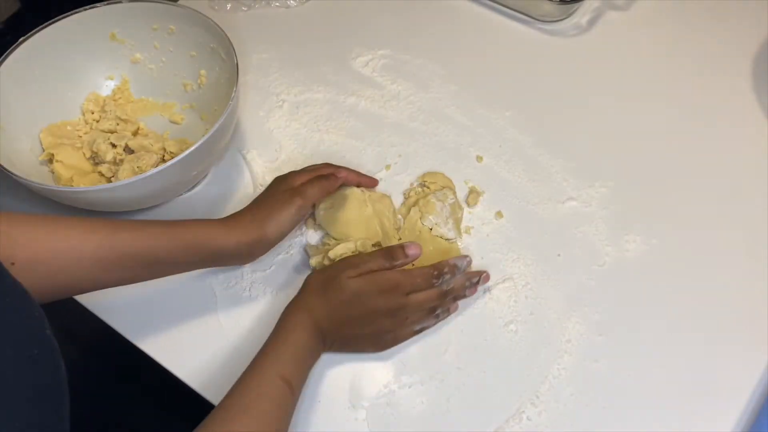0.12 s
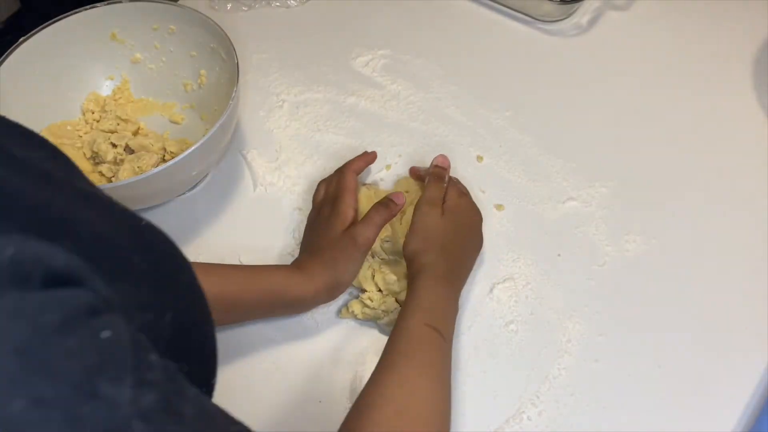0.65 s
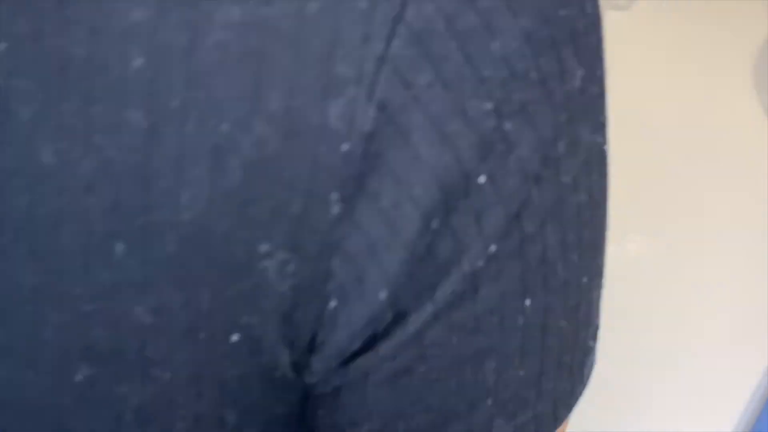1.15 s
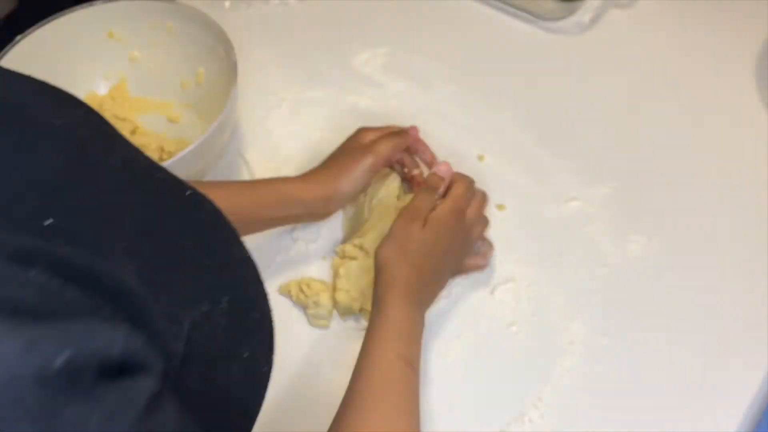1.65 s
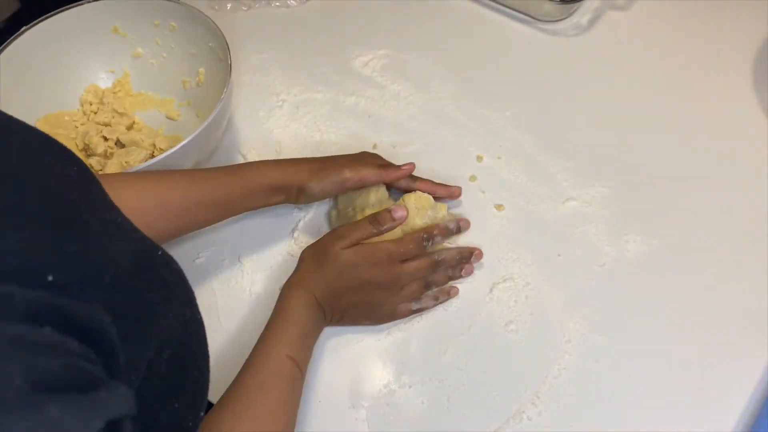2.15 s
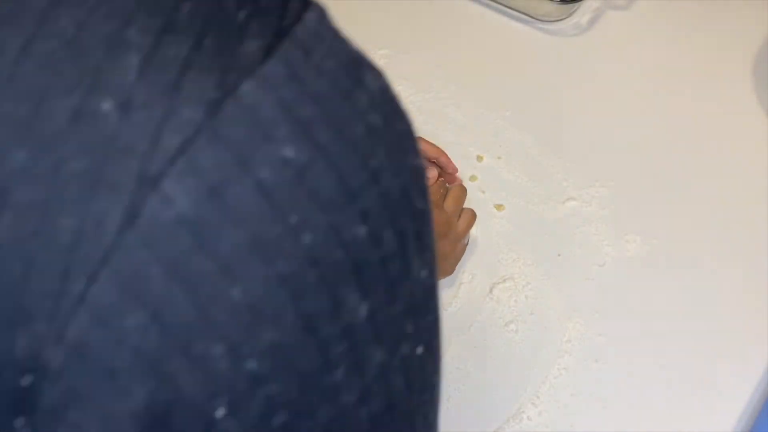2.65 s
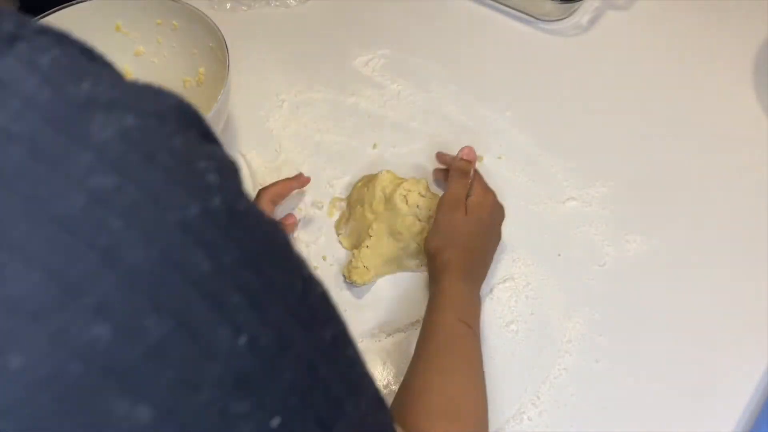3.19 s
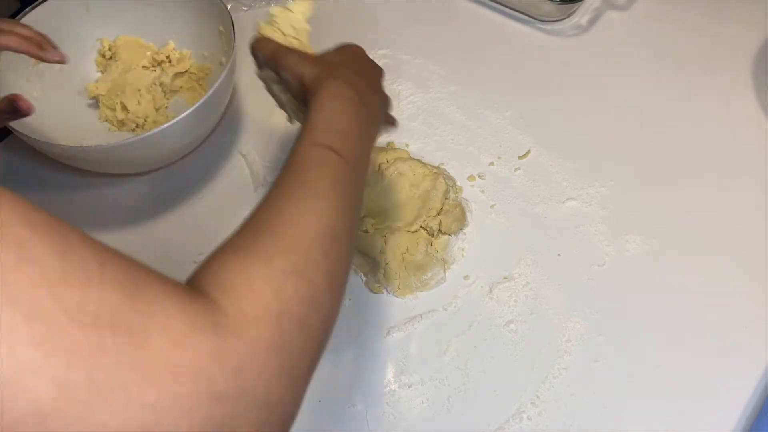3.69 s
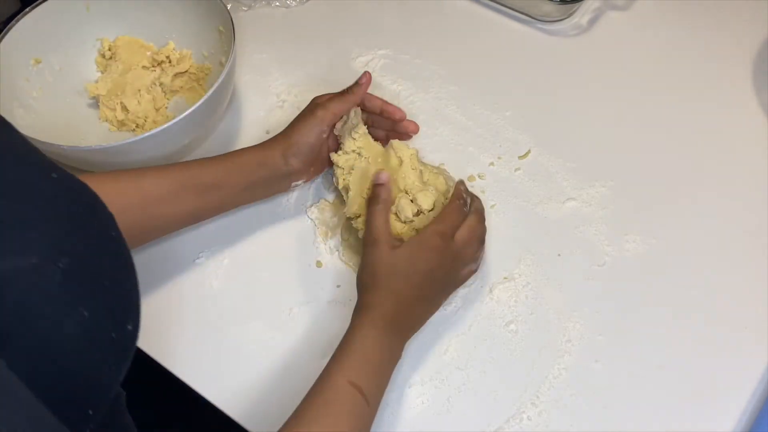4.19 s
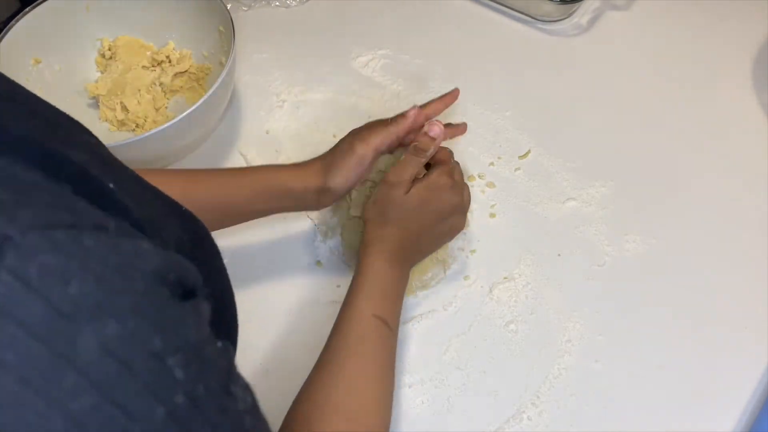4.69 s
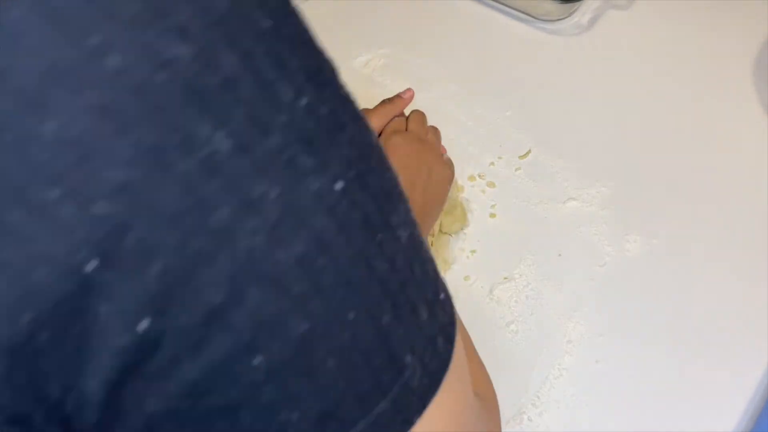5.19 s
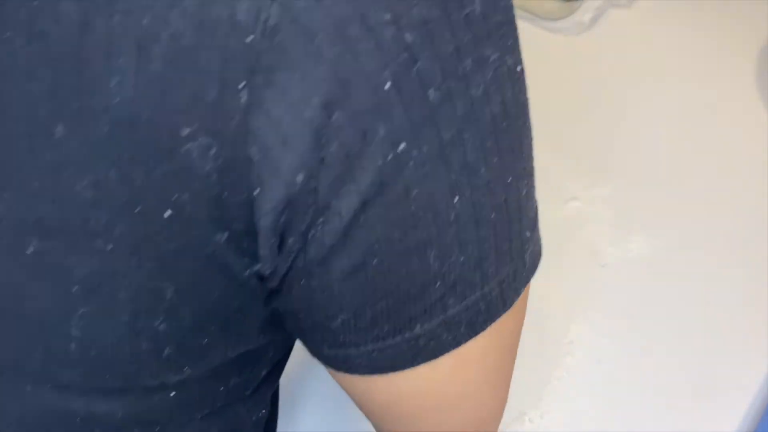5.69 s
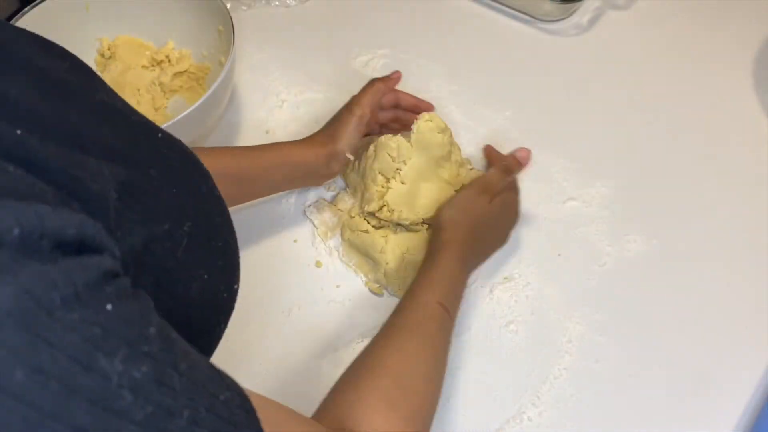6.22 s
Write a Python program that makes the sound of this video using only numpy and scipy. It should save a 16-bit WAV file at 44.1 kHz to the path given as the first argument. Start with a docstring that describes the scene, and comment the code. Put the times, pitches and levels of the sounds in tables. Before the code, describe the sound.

Over a fridge-like hum, hands sweep and knead dough with gritty rubs, sticky ticks, a few thuds, faint clinks and one brief bowl scrape.

```python
"""Hands gather and press dough on a floured counter: palms hiss and drag as shaped noise under stroke gains.
Knocks, dough thuds, crockery clinks and sticky ticks are short contacts that ring decaying modes.
A sliding bowl filters grit through its resonances; early echoes and a noise tail answer the contacts.
A fridge motor, a fan and mains hum (sines) throb over the room's air (noise). Everything dips briefly once.
Source levels are dB before the dip and the record gain."""
import sys
import numpy as np
from scipy import signal
from scipy.fft import rfft, irfft
from scipy.io import wavfile
from scipy.ndimage import uniform_filter1d

SR = 44100
rng = np.random.default_rng(int(sys.argv[2]) if len(sys.argv) > 2 else 0)


def unload_audio(sound):
    """Save the sound as a 16-bit wav file, at the path given as the first command line argument."""
    columns = np.transpose(np.atleast_2d(sound))
    # keep every value between -1 and 1, then stretch to whole-number steps
    steps = np.round(np.clip(columns, -1, 1) * 32767)
    wavfile.write(sys.argv[1], SR, steps.astype(np.int16))


def volts(x):
    """Linear amplitude factor 10**(x/20) for a level x in dB, scalar or array-like."""
    e = np.asarray(x, float) / 20
    return 10 ** e


N = 279567
T = np.arange(N) / SR
PORT_LAG_S = 0.00046  # right microphone hears the room this much later
DIP_S = 3.335


def level(x, db):
    """Scale to an rms level."""
    return x * volts(db) / np.sqrt(np.mean(x ** 2))


def colour(x, points):
    """Filter by (freq_hz, gain_db) points, interpolated over log frequency."""
    hz, db = np.transpose(points)
    f = np.maximum(np.fft.rfftfreq(x.shape[-1], 1 / SR), 1)
    gain = volts(np.interp(np.log(f), np.log(hz), db))
    return irfft(rfft(x) * gain, x.shape[-1])


def walk(rate_hz):
    """Random levels held 1 / rate_hz and slewed twice; spread near 1."""
    k = int(SR / rate_hz)
    held = np.repeat(rng.standard_normal(N // k + 1), k)
    return 1.45 * uniform_filter1d(uniform_filter1d(held, k), k)[:N]


def pan(left_minus_right_db):
    """Left and right gain."""
    return volts(np.array([[left_minus_right_db], [-left_minus_right_db]]) / 2)


def pair(make, alike, lag_s):
    """Two channels: a shared part, lag_s later on the right, and a part of their own."""
    shared, share = make(), np.clip(alike, 0, 1)
    both = np.array([shared, np.roll(shared, round(lag_s * SR))])
    own = np.array([make(), make()])
    return np.sqrt(share) * both + np.sqrt(1 - share) * own


def white():
    """Plain white noise."""
    return rng.standard_normal(N)


def grit():
    """Dense grains of uneven size."""
    size_db = 2.4 * rng.exponential(1, N)
    return rng.standard_normal(N) * volts(size_db)


def strokes(rows, lift_db_per_s):
    """Gain of strokes that rise smoothly, sag while they hold and die away; their powers add."""
    sag_db_per_s = 12
    start, rise, hold, db = np.transpose(rows)[:, :, None]
    coarse = T[::64]
    t = coarse - start
    held = np.clip(t - rise, 0, hold)
    lifted = np.maximum(t - rise - hold, 0)
    onset = np.sin(np.pi / 2 * np.clip(t / rise, 0, 1)) ** 2
    gain = onset * volts(db - sag_db_per_s * held - lift_db_per_s * lifted)
    return np.interp(T, coarse, np.sqrt(np.sum(gain ** 2, axis=0)))


def ring(modes, sides):
    """Exponentially decaying sine modes, each with its weight on the two sides."""
    hz, db, t60 = np.transpose(modes)[:, :, None]
    t = T[:SR // 2]
    decay = np.exp(-np.log(1000) * t / t60)
    return sides @ (volts(db) * np.sin(2 * np.pi * hz * t) * decay)


def centred(modes):
    """Equal mode weights on both sides."""
    return np.ones((2, len(modes)))


def blow(contact_ms):
    """A force that rises and relaxes smoothly; softer contact lasts longer."""
    u = T[:SR // 20] * 4000 / contact_ms
    force = u * np.exp(-u)
    return force / np.sum(force)


def rattle(length_ms):
    """A firm first contact and a dying run of tiny uneven ones."""
    t = T[:SR // 10]
    fade = np.exp(-t * 3000 / length_ms)
    run = grit()[:SR // 10] * fade / np.sqrt(np.sum(fade ** 2))
    return run + 0.27 * (t == 0)


def add(out, s, db, push, body):
    """One contact: the push sets the body ringing."""
    sound = signal.fftconvolve(body, push[None], axes=1)
    i = round(s * SR)
    out[:, i:i + sound.shape[1]] += volts(db) * sound[:, :N - i]


# air spectrum: freq_hz, density_db_per_hz (relative)
AIR_SHAPE = [(25, -14), (50, -4.5), (80, -3.5), (120, -0.5), (180, -3.5), (320, -4), (500, -10.5),
             (700, -20.5), (1200, -25.5), (1700, -31.5), (2200, -43), (5000, -42.5), (12000, -55),
             (16000, -59.5)]


def air():
    """Broad rumble of fans in the room: noise alike left and right in the bass, less so above."""
    bass = colour(pair(white, alike=0.58, lag_s=PORT_LAG_S), [(150, -0.5), (600, -13), (2000, -42.5)])
    rest = colour(pair(white, alike=0.3, lag_s=PORT_LAG_S), [(50, -26), (150, -5), (600, 0.5)])
    noise = level(colour(bass + rest, AIR_SHAPE), -61.5)
    return noise * pan(-1.2) * volts(0.6 * walk(3.6))


# fridge motor harmonics: order, level_db_rms (before wander and pan)
MOTOR_ORDERS = [(1, -74), (2, -63.5), (3, -83.5), (4, -81.5), (5, -74.5), (6, -76), (7, -81.5)]
# fan harmonics: order, level_db_rms (before wander and pan); order 27 is the blade tone
FAN_ORDERS = [(1, -66), (4, -82.5), (8, -77), (27, -81)]


def hum():
    """Motor and fan run three turns a second apart and throb, with mains hum; louder on the right."""
    motor_hz, fan_hz, mains_hz, mains_db = 56.17, 59.43, 119.94, -70.5
    # motor and fan fundamentals align at these times; the phases jump at the dip
    align_before_s, align_after_s = 0.075, 4.19
    clock = T - np.where(T < DIP_S, align_before_s, align_after_s)
    turn = 2 * np.pi * (clock - np.array([[0], [PORT_LAG_S]]))
    motor = sum(volts(db + 1.3 * walk(2.8)) * np.cos(k * motor_hz * turn + k - 1)
                for k, db in MOTOR_ORDERS)
    fan = sum(volts(db + (0.8 + 0.05 * k) * walk(4.5 + 0.5 * k)) * np.cos(k * fan_hz * turn + k - 1)
              for k, db in FAN_ORDERS)
    mains = volts(mains_db) * np.cos(mains_hz * turn)
    return np.sqrt(2) * pan(-2.0) * (motor + fan + mains)  # sqrt(2): rms to peak


def room(x):
    """A fading cloud of reflections, duller than the direct sound; its bass is the same on both sides."""
    t60_s, room_db, onset_s = 0.46, -3, 0.0013
    t = T[:SR // 2]
    own, shared = rng.standard_normal((2, len(t))), rng.standard_normal(len(t))
    own = colour(own, [(30, -30), (100, -8), (500, 2.5), (1200, -1), (4000, -5), (12000, -5)])
    shared = colour(shared, [(30, -25), (90, -4), (200, -1), (800, -12.5), (3000, -36.5)])
    tail = (own + shared) * np.exp(-np.log(1000) * t / t60_s) * np.minimum(t / onset_s, 1)
    tail /= np.sqrt(np.sum(tail ** 2) / 2)
    return volts(room_db) * signal.fftconvolve(x.mean(0)[None], tail, axes=1)[:, :N]


# nearby walls: delay_ms, level_db, left_minus_right_db
WALLS = [(5.6, -9.5, 6.5), (8.2, -10, -5), (14.2, -9.5, 5)]


def echoes(x):
    """Single early reflections: delayed, weakened, panned copies."""
    return sum(volts(db) * pan(pan_db) * np.roll(x, round(ms * SR / 1000), axis=1)
               for ms, db, pan_db in WALLS)


# bowl slide: start_s, rise_s, hold_s, level_db
SLIDE_LOW = (3.335, .018, .14, -55.5)
# its high resonances start later and stop sooner: start_s, rise_s, hold_s, level_db
SLIDE_TOP = (3.35, .04, .09, -66)
# bowl resonances: freq_hz, width_hz, level_db (relative within the low or high group)
BOWL_PEAKS = [(600, 30, 0), (736, 70, 3.5), (1070, 890, -3), (2400, 1200, -15), (1790, 40, -3),
              (2055, 39, 3), (2220, 60, -3), (2510, 20, 5.5), (3220, 99, -13), (5000, 90, 0),
              (6360, 180, -11), (6000, 5000, -32)]


def bowl():
    """The foot of the bowl scrapes in slips and rings its resonances, low and high groups apart."""
    split_hz, low_stop_db_per_s, high_stop_db_per_s = 4000, 160, 190
    scrape = rfft(pair(grit, alike=0.5, lag_s=0.00029) * volts(1.1 * walk(55)))
    f = np.fft.rfftfreq(N, 1 / SR)

    def resonate(peaks):
        power = sum(volts(db) ** 2 / (1 + (2 * (f - hz) / width) ** 2) for hz, width, db in peaks)
        return level(irfft(scrape * np.sqrt(power), N), 0)

    low = resonate([p for p in BOWL_PEAKS if p[0] < split_hz])
    high = resonate([p for p in BOWL_PEAKS if p[0] > split_hz])
    return low * strokes([SLIDE_LOW], low_stop_db_per_s) + high * strokes([SLIDE_TOP], high_stop_db_per_s)


# crockery clinks: start_s, strength_db, rattle_ms
CLINK_EVENTS = [(3.038, -79, 30), (3.543, -65, 20), (3.62, -64.5, 40), (3.691, -76.5, 39),
                (3.955, -65.5, 24), (4.004, -63.5, 35), (4.063, -65, 35), (4.72, -67.5, 27)]
# crockery modes: freq_hz, level_db, t60_s
CROCKERY_MODES = [(675, -9.5, 0.28), (1065, -10.5, 0.069), (1377, -7, 0.06), (2690, -15, 0.06),
                  (3146, -9.5, 0.21), (3640, -7.5, 0.05), (3803, -8, .09), (3950, -19.5, 0.042)]


def clinks():
    """Crockery rattles faintly and rings, its modes weighted anew each time."""
    out = np.zeros((2, N))
    for s, db, length_ms in CLINK_EVENTS:
        sides = rng.uniform(0.6, 1, (2, len(CROCKERY_MODES)))
        add(out, s, db, rattle(length_ms), ring(CROCKERY_MODES, sides))
    return out


# dough and weight landing: start_s, strength_db, push_ms
THUD_EVENTS = [(2.1, -46.5, 9.7), (3.889, -45, 4.4), (3.898, -39, 7), (3.921, -40, 7), (3.963, -43, 18),
               (3.99, -48, 14), (4.858, -54, 5)]
# cupboard modes: freq_hz, level_db, t60_s
CUPBOARD_MODES = [(58, -4, .2), (76.5, -11, .1), (99.3, 1, .12), (118.4, -1.5, .1), (141.4, -1, .12)]


def thuds():
    """Dough lands: a long soft push rings the cupboard's low modes."""
    out = np.zeros((2, N))
    body = ring(CUPBOARD_MODES, centred(CUPBOARD_MODES))
    for s, db, push_ms in THUD_EVENTS:
        add(out, s, db, blow(push_ms), body)
    return out


# blows on the counter: start_s, strength_db, contact_ms, near_db (share straight from the contact)
BLOW_EVENTS = [(2.0888, -34, 1.3, -30), (2.0921, -29, 1.4, -20), (2.0976, -50.5, 0.3, -6),
               (2.0991, -30.5, 0.2, 0.5), (2.883, -62, 0.67, 3.5), (3.884, -46.5, 2, -5),
               (4.852, -45, 3.5, -24), (4.863, -52.5, 1.15, -10.5)]
# counter modes: freq_hz, level_db (before side weights and panel trim), t60_s
COUNTER_MODES = [(138, -6, 0.19), (286, -4.5, 0.21), (405, -4.5, .22), (464, -8.5, .22), (549, -4.5, 0.16),
                 (576, -6, 0.2), (701, -6.5, 0.17), (760, -8, .2), (860, -7, 0.24), (920, -8.5, .22),
                 (1052, -7.5, .2), (1121, -9, .2), (1236, -9.5, .2), (1432, -16, .2), (1641, -13, .17),
                 (1777, -17, .2), (1938, -13.5, .25), (1957, -14, .25), (2040, -12.5, .25),
                 (2190, -12, 0.22), (2280, -12.5, .17), (2522, -14.5, .2), (2840, -18, .2),
                 (3140, -17.5, .2)]
# short ring at the point of contact: freq_hz, level_db, t60_s
CONTACT_MODES = [(864, 6.5, 0.012), (1105, 12.5, 0.012), (1340, 2.5, 0.0056), (2070, 7.5, 0.0089),
                 (2890, -15, 0.026), (3810, -12.5, .01), (6210, -11.5, .006)]


def knocks():
    """A blow rings the counter and the contact point; the latter is earlier and louder on the left."""
    out, panel_db = np.zeros((2, N)), -7
    panel = volts(panel_db) * ring(COUNTER_MODES, rng.uniform(0.5, 1, (2, len(COUNTER_MODES))))
    near = pan(3.5) * ring(CONTACT_MODES, centred(CONTACT_MODES))
    near[1] = np.roll(near[1], round(0.00025 * SR))
    for s, db, contact_ms, near_db in BLOW_EVENTS:
        add(out, s, db, blow(contact_ms), panel + volts(near_db) * near)
    return out


# sticky dough lets go of skin: start_s, strength_db, centre_hz, length_ms, left_minus_right_db
TICK_EVENTS = [(.3706, -66, 6800, 12, 0), (1.5226, -63, 2380, 12, -1), (1.554, -48.5, 2400, 10, 1),
               (2.56, -57, 6000, 8, -2), (2.883, -48, 3770, 3.5, 0), (3.8835, -51, 2174, 4.1, 2),
               (3.884, -60, 4700, 6, 1), (4.004, -56, 9800, 9.6, -0.5), (5.846, -51, 4500, 10, -6),
               (5.877, -43, 3900, 1.1, 10)]


def ticks():
    """Dough snaps off skin: a tiny rattle rings three very short modes."""
    out = np.zeros((2, N))
    for s, db, hz, length_ms, pan_db in TICK_EVENTS:
        snap = [(hz, -9, 0.003), (hz * 0.59, -12, 0.004), (hz * 1.3, -15, 0.002)]
        add(out, s, db, rattle(length_ms), pan(pan_db) * ring(snap, centred(snap)))
    return out


# palm sweeps: start_s, rise_s, hold_s, flour_db (before layer trim), crumbs_minus_flour_db (before trims)
SWEEP_EVENTS = [(-0.036, 0.086, 0.077, -63.0, -4.0), (0.343, 0.038, 0.021, -75.5, -3.0),
                (0.476, 0.066, 0.085, -73.0, -1.0), (0.616, 0.119, 0.145, -77.0, 1.0),
                (0.811, 0.174, 0.082, -84.5, 13.0), (1.076, 0.056, 0.309, -91.5, 12.0),
                (1.474, 0.102, 0.082, -74.5, -2.5), (1.64, 0.066, 0.059, -72.0, -3.5),
                (1.814, 0.13, 0.025, -75.0, -5.5), (1.932, 0.063, 0.102, -62.5, -4.5),
                (2.125, 0.026, 0.282, -73.0, -1.0), (2.451, 0.124, 0.131, -76.0, 1.0),
                (2.825, 0.078, 0.013, -77.0, -3.0), (3.151, 0.103, 0.047, -68.0, -1.0),
                (3.347, 0.034, 0.091, -75.5, 5.5), (3.864, 0.014, 0.017, -89.0, 1.0),
                (3.987, 0.008, 0.013, -84.0, -1.5), (4.261, 0.089, 0.222, -86.5, -0.5),
                (4.436, 0.032, 0.025, -82.0, -9.0), (4.537, 0.086, 0.009, -78.0, -6.0),
                (4.69, 0.08, 0.033, -80.0, 0.0), (4.852, 0.054, 0.061, -82.0, -7.0),
                (4.982, 0.062, 0.078, -87.5, 1.0), (5.135, 0.063, 0.171, -82.0, -3.0),
                (5.292, 0.145, 0.228, -81.5, 1.0), (5.766, 0.111, 0.055, -76.0, -3.0),
                (5.93, 0.09, 0.16, -76.0, -7.5), (6.156, 0.066, 0.022, -70.0, -7.0)]
# skin and dough drags: start_s, rise_s, hold_s, level_db (before layer trim)
DRAG_EVENTS = [(-0.03, 0.044, 0.098, -74.5), (0.353, 0.041, 0.005, -80.5), (0.481, 0.062, 0.292, -75.0),
               (0.737, 0.21, 0.128, -71.5), (1.07, 0.032, 0.332, -75.5), (1.511, 0.048, 0.029, -68.5),
               (1.61, 0.079, 0.078, -68.0), (1.858, 0.067, 0.074, -79.5), (1.946, 0.116, 0.185, -67.5),
               (2.297, 0.032, 0.18, -79.5), (2.491, 0.083, 0.149, -73.0), (2.789, 0.068, 0.205, -84.5),
               (3.163, 0.078, 0.105, -73.0), (3.538, 0.011, 0.07, -82.0), (3.87, 0.008, 0.084, -74.0),
               (3.987, 0.029, 0.005, -72.5), (4.194, 0.15, 0.041, -79.5), (4.436, 0.02, 0.203, -88.5),
               (4.699, 0.041, 0.069, -81.5), (4.842, 0.045, 0.434, -89.5), (5.279, 0.14, 0.223, -81.0),
               (5.821, 0.031, 0.027, -72.0), (5.944, 0.083, 0.157, -74.5), (6.182, 0.041, 0.076, -73.5)]
# layer spectra: freq_hz, density_db_per_hz (relative)
FLOUR_SHAPE = [(5000, -22.5), (8000, -4), (9500, -5.5), (10500, -3), (12300, -5), (14200, -2), (15700, -7)]
CRUMBS_SHAPE = [(4500, -21.5), (5600, -10), (6500, 1), (7500, -3.5), (9000, -14.5)]
SLEEVE_SHAPE = [(2800, -13), (3900, -4), (4700, -2.5), (5300, -5.5), (6200, -23.5)]
DRAG_SHAPE = [(300, -11.5), (600, 4.5), (1200, -1), (2200, -6), (3200, -10), (4000, -17.5), (6000, -28.5)]


def palms():
    """Fine flour and coarser crumbs roll under the skin, cloth brushes, dough drags; each flickers alone."""
    sweep_lift_db_per_s, drag_lift_db_per_s = 200, 108
    flour = strokes([row[:4] for row in SWEEP_EVENTS], sweep_lift_db_per_s)
    crumbs = strokes([(*row[:3], row[3] + row[4]) for row in SWEEP_EVENTS], sweep_lift_db_per_s)
    drag = strokes(DRAG_EVENTS, drag_lift_db_per_s)
    sleeve = np.hypot(volts(-3) * crumbs, volts(-12) * drag)  # cloth brushes with every stroke
    # gain, spectrum, alike, lag_s (right after left), trim_db
    layers = [(flour, FLOUR_SHAPE, 0.6, -0.00018, 2.5),
              (crumbs, CRUMBS_SHAPE, 0.45, -0.00018, 0.6),
              (sleeve, SLEEVE_SHAPE, 0.3, 0.0002, 0.6),
              (drag, DRAG_SHAPE, 0.25, PORT_LAG_S, 5.3)]
    out = np.zeros((2, N))
    for gain, shape, alike, lag_s, trim_db in layers:
        noise = level(colour(pair(grit, alike, lag_s), shape), trim_db)
        out += noise * gain * volts(1.2 * walk(20))
    return out


def dip():
    """Gain of one brief level dip."""
    depth_db, fall_s, rise_s = -16, 0.032, 0.02
    away = np.maximum((DIP_S - T) / fall_s, (T - DIP_S) / rise_s)
    return volts(depth_db * np.clip(1 - away, 0, 1))


def scene():
    """All sources, with the short dip; echoes and room answer the contacts only."""
    struck = clinks() + thuds() + knocks() + ticks()
    reflected = echoes(struck) + room(struck)
    return (air() + hum() + bowl() + struck + reflected + palms()) * dip()


def band_limit(x):
    """A steep low-pass at the top of the band."""
    return signal.sosfilt(signal.butter(12, 16820, fs=SR, output="sos"), x)


# overall response: freq_hz, gain_db
RECORDING_RESPONSE = [(20, -28), (40, -6), (55, -1), (12400, 0), (12800, -24.5), (13500, -22.5),
                      (13900, 0.5), (15720, 6), (15800, -60.5)]


def record(dry):
    """Deepest bass rolled off, a gap near 13 kHz, next to nothing above 15.8 kHz."""
    record_gain_db = 2.3
    mix = colour(volts(record_gain_db) * dry, RECORDING_RESPONSE)
    return band_limit(mix)


dry = scene()
out = record(dry)
unload_audio(out)
```